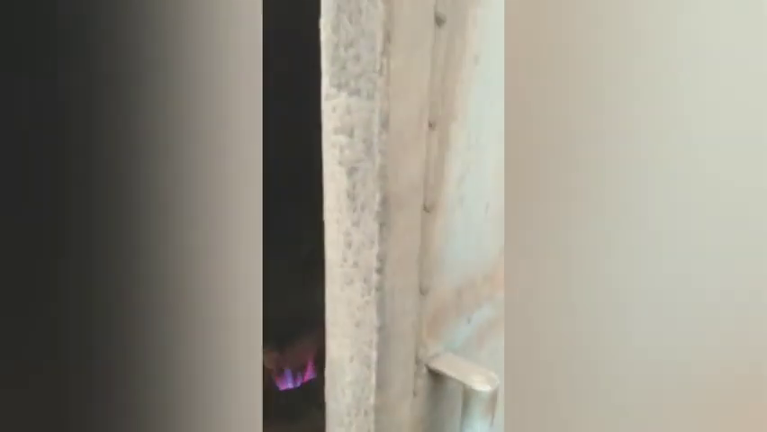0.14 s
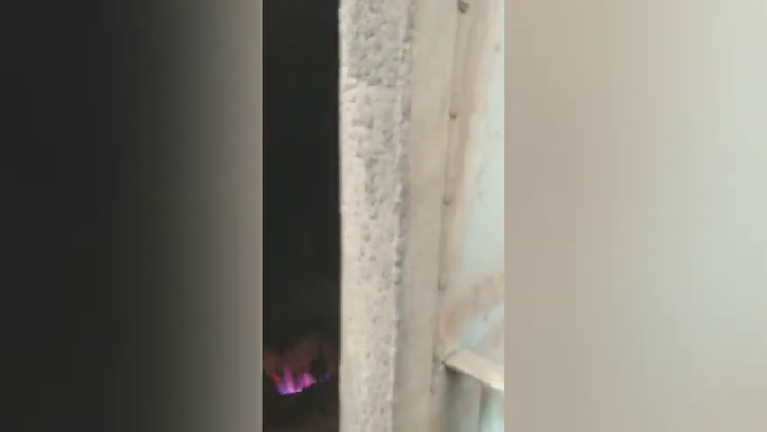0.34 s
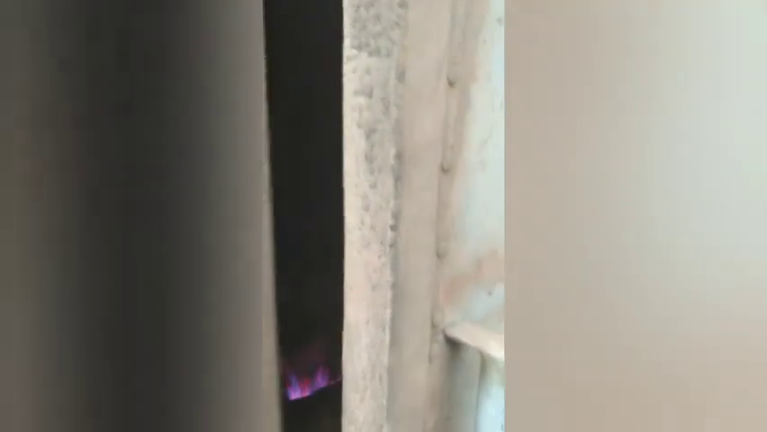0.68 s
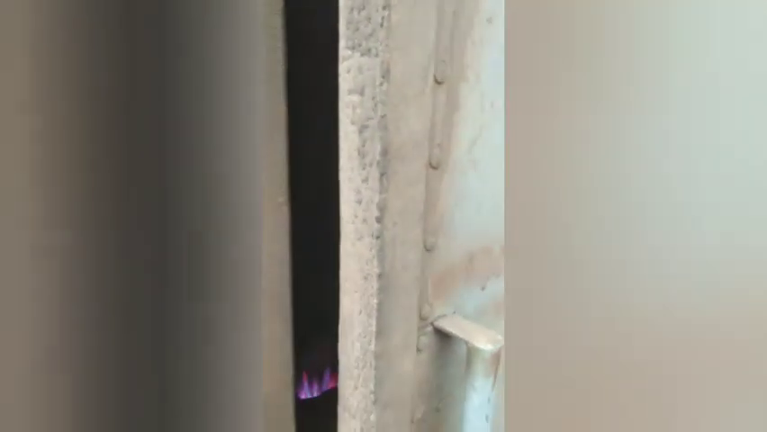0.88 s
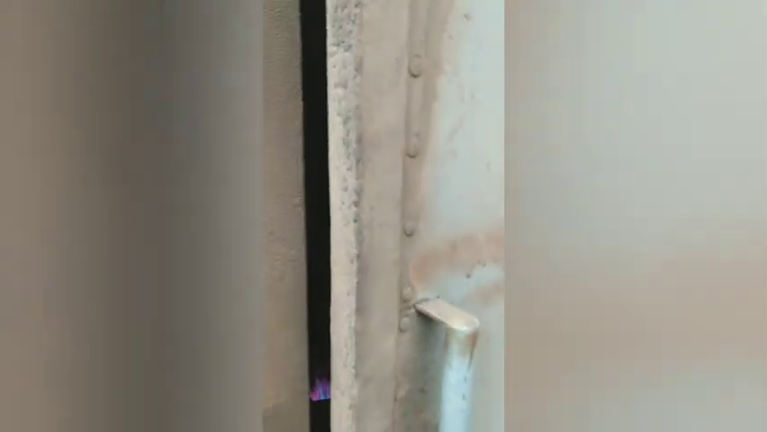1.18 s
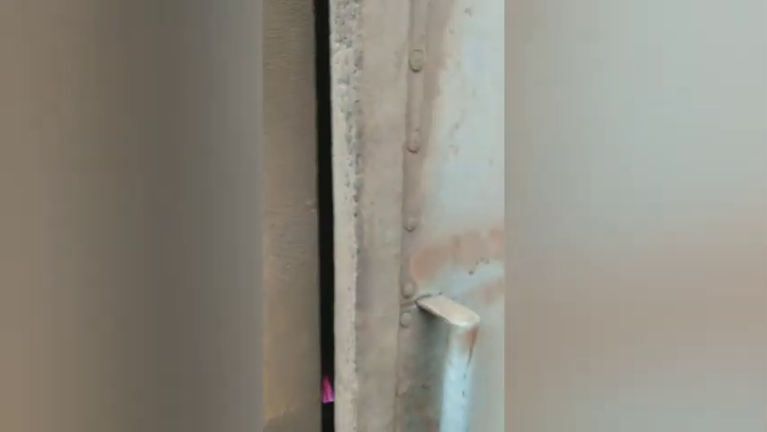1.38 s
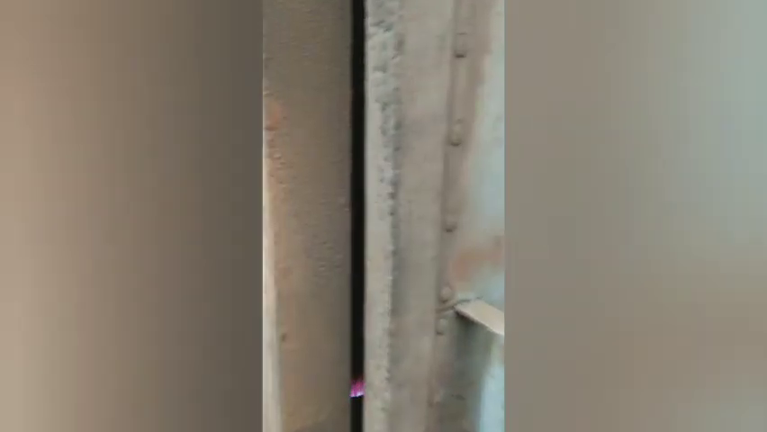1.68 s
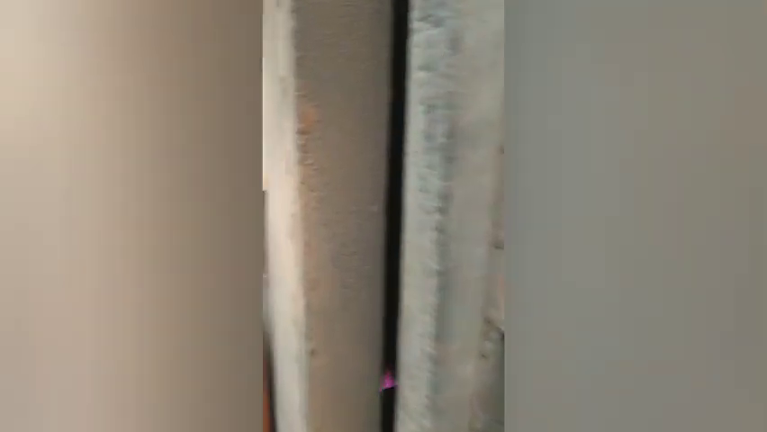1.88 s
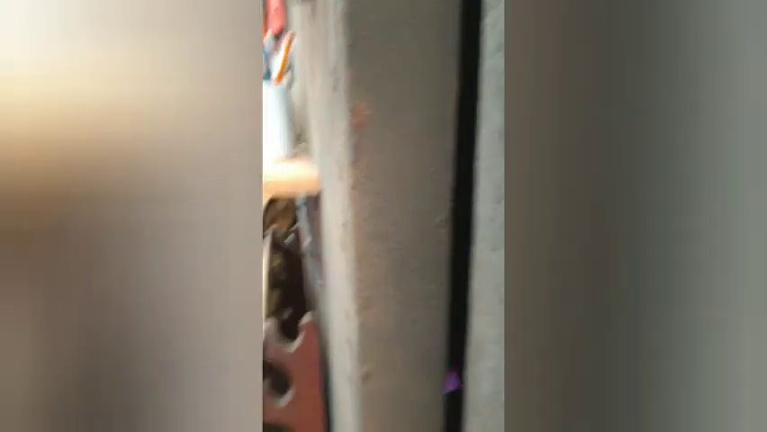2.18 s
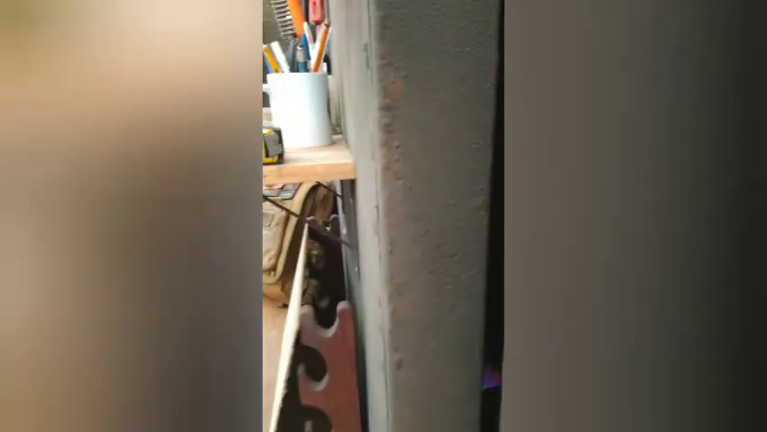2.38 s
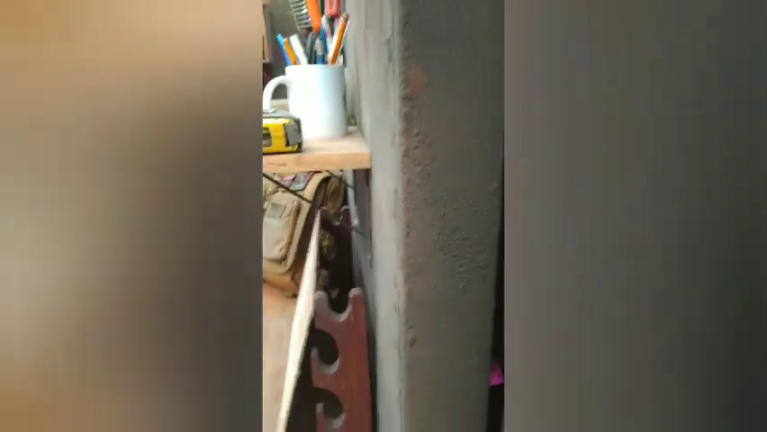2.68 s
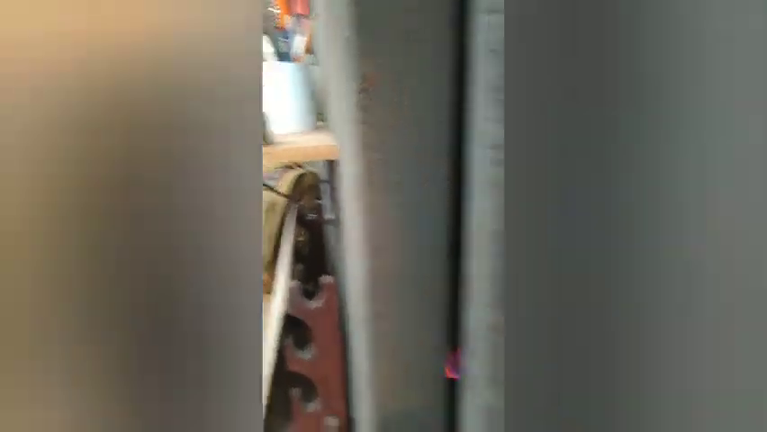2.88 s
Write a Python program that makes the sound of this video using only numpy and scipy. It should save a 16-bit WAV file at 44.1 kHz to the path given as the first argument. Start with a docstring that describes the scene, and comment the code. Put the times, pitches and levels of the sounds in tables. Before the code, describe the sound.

Hollow, low roar of a gas flame in a sheet-metal oven, wavering slightly without pause.

```python
"""A hollow roar sounds at once: a gas burner in a sheet-metal oven, heard through its door gap in a workshop.
Turbulent flame noise drives the air modes of the oven box, each a narrow resonance ringing on noise.
Broad flame noise and the hiss of the jets spread above them; draughts add brief rumbles at the ports.
A phone with two microphone ports far apart turns slowly past the gap.
It makes stereo by subtracting each port, delayed, from the other."""
import sys
import numpy as np
from scipy import signal
from scipy.fft import rfft, irfft
from scipy.io import wavfile
from scipy.ndimage import uniform_filter1d

SR = 44100
rng = np.random.default_rng(int(sys.argv[2]) if len(sys.argv) > 2 else 0)


def boost(x):
    """Linear amplitude factor 10**(x/20) for a level x in decibels (scalar or array-like)."""
    u = np.asarray(x, float) / 20
    return 10 ** u


def store_pcm(level_fs):
    """Save levels as 16-bit WAV."""
    pcm = np.round(np.clip(level_fs, -1, 1) * 32767).astype(np.int16)
    wavfile.write(sys.argv[1], SR, np.atleast_2d(pcm).T)


N = 134505


def at_hz(points, hz, col=1):
    """Interpolation on a logarithmic frequency axis, on which equal ratios are equal steps."""
    points = np.array(points)
    return np.interp(np.log(hz + 1e-9), np.log(points[:, 0]), points[:, col])


def drift(rate_hz):
    """Random modulation of unit spread: white noise through a double low-pass pole."""
    step = 40   # samples between computed points
    pole = np.exp(-2 * np.pi * rate_hz * step / SR)
    noise = rng.standard_normal(N // step + 2002)
    slow = signal.lfilter([1], [1, -2 * pole, pole * pole], noise)[2000:]   # settled part
    return np.interp(np.arange(N) / step, np.arange(len(slow)), slow / slow.std())


def level_db(hz):
    """Amplitude modulation by frequency region: neighbouring level curves blend on a log axis."""
    # centre of each level curve: f/Hz
    centres = [155, 208, 310, 660, 1100, 2900, 6500, 12000]
    # uneven level of the low boom, of which only the swing about the mean counts:
    # t/s, lowest modes level/dB, second mode level/dB, next modes level/dB
    boom = [(0.0, -25, -44, -40), (0.06, -29.5, -39.5, -31.5), (0.12, -29, -30.5, -32.5),
            (0.21, -30, -28, -27.5), (0.33, -32.5, -39.5, -28.5), (0.52, -27.5, -27.5, -28.5),
            (0.6, -30, -34, -29), (0.67, -32, -32.5, -32), (1.09, -27, -40.5, -26), (1.16, -28, -28, -35),
            (1.22, -37, -39, -29.5), (1.47, -31, -28.5, -27), (1.51, -32.5, -38, -29.5),
            (1.57, -39, -32, -29.5), (1.6, -28.5, -43, -24.5), (1.72, -28, -30, -37.5),
            (1.76, -42.5, -42, -29.5), (1.83, -31.5, -19, -28.5), (1.95, -26.5, -34, -26.5),
            (2.08, -47, -27, -31), (2.14, -17, -30, -23.5), (2.18, -29, -28, -32.5),
            (2.31, -25, -40, -29.5), (2.71, -33.5, -28.5, -29.5), (2.9, -24, -39.5, -33.5),
            (3.05, -41, -37.5, -24.5)]
    # uneven level of the roar and hiss, again only the swing about the mean: t/s, lower roar level/dB,
    # roar level/dB, upper roar level/dB, jet hiss level/dB, top of the hiss level/dB
    roar = [(0.03, -44.5, -43.5, -53, -64, -71), (0.37, -45.5, -38, -50, -59, -66),
            (0.47, -41.5, -35.5, -48, -57.5, -68), (0.6, -47, -42, -53, -62, -69.5),
            (0.99, -40.5, -38.5, -47.5, -54, -61.5), (1.02, -36, -38, -45.5, -58, -65),
            (1.22, -41, -37.5, -50, -58, -65.5), (1.59, -42, -37, -53, -60.5, -69.5),
            (1.69, -40.5, -43, -49, -66, -68), (1.75, -47, -35, -57.5, -62, -69),
            (1.79, -34.5, -40.5, -48, -61, -67), (1.83, -46, -36.5, -48.5, -61.5, -69),
            (1.96, -48, -40.5, -53.5, -64.5, -72), (2.09, -40, -37, -49.5, -62, -68),
            (2.3, -45.5, -40, -49.5, -65, -71.5), (2.49, -40.5, -38, -48.5, -60.5, -67),
            (2.6, -40, -37.5, -49, -58.5, -66.5), (2.96, -44, -41, -51.5, -61, -70.5),
            (3.05, -45, -37.5, -50.5, -60, -70)]
    inertia_s = 0.05   # moving average that smooths the levels
    curves = []
    for times, *columns in (np.transpose(boom), np.transpose(roar)):
        curves += [(times, column) for column in columns]
    # an octave below the first centre the swing has faded out: the deepest rumble stays even
    place = np.interp(np.log(hz), np.log([centres[0] / 2, *centres]), np.arange(-1, len(curves)))
    t = np.arange(N) / SR
    swing = np.zeros(N)
    for k, (times, column) in enumerate(curves):
        share = max(0, 1 - abs(place - k))
        swing += share * np.interp(t, times, column - np.mean(column))
    return uniform_filter1d(swing, size=int(inertia_s * SR))


def oven_boom(hz):
    """Cavity resonance: each air mode rings on its own noise, and its strength and balance shift."""
    # air modes of the oven: f/Hz, width/Hz of the resonance factor, level/dB re burner,
    # swell/dB from start to end, left minus right port level/dB at start, the same at end
    modes = [(96.2, 6.8, -34.5, 10, -1, 0.5), (126.1, 5.8, -25.5, -7, 2.2, -3),
             (156.43, 10.2, -18, -1.5, 0.5, -1.3), (179.5, 11.2, -26, -13.5, 4, -1.5),
             (209.6, 7.65, -21.5, 0, -3, -6.5), (246.3, 14, -29, 9, 1.5, -1),
             (298, 12.8, -30.5, 4.5, 6.5, -6), (324.9, 5.8, -29, 0.5, 7, 2.5),
             (348.7, 13.6, -39, 15.5, 4, -4), (377.8, 43, -44, 14, 11, 6), (439, 21.7, -38.5, -4, 9, -1.5),
             (509.6, 38, -42, 3, 10.5, -11), (569.3, 19, -49, 4.5, 5, 3), (934, 49, -56.5, -1, 23.5, -25),
             (1038, 33, -53.5, -3, 4, 6), (1266.5, 36, -57, -7.5, 23, -34)]
    # phase by which the modes reach the left port first: f/Hz, phase/rad
    mode_lead = [(100, .03), (126, .12), (156, .02), (208, .2), (254, .15), (326, -.2), (384, .8),
                 (440, .25), (512, .9), (940, .1)]
    steadiness = 0.62   # 0 free noise, 1 even hum: the flame feeds on the modes and evens their swing
    flicker_db, flicker_hz = 1.42, 5.9
    boom = 0
    for mode_hz, width_hz, db, swell_db, start_db, end_db in modes:
        offset = hz - mode_hz
        resonance = 1 / (1 + 2j * offset / width_hz)
        skirt = 1 / (1 + (offset / (2 * width_hz)) ** 2)   # steepens the flanks
        # positive frequencies alone give a complex signal whose modulus is the envelope
        ringing = np.fft.ifft(2 * rfft(rng.standard_normal(N)) * resonance * skirt, N)
        envelope = abs(ringing)
        rms = np.sqrt(np.mean(envelope ** 2))
        ringing = ringing * (rms / (envelope + 0.29 * envelope.mean())) ** steadiness
        lead = at_hz(mode_lead, mode_hz)
        tone = (ringing * np.exp([[.5j * lead], [-.5j * lead]])).real
        lean = np.linspace(start_db, end_db, N) / 2
        swell = np.linspace(-swell_db, swell_db, N) / 2
        level = db + swell + level_db(mode_hz) + flicker_db * drift(flicker_hz)
        boom = boom + tone * boost(level + np.array([lean, -lean]))
    return boom


def flame(hz):
    """Turbulent combustion noise: broadband, partly coherent between ports, flickering band by band."""
    # broad flame noise: f/Hz, level/dB re burner alike at both ports,
    # level/dB re burner opposite at the ports, left minus right level/dB
    spectrum = [(19.9, -60, -81, 20), (45, -50, -51, 4), (85, -42.5, -69, -3), (153, -39, -59.5, 1.5),
                (235, -44.5, -46.5, -12), (327, -39.5, -51.5, 7), (428, -52, -51.5, -4),
                (520, -58.5, -48.5, 6.5), (616, -60, -62, -7), (820, -59.5, -68.5, -8.5),
                (1084, -56, -55.5, 4.5), (1190, -57, -63, -7.5), (1370, -59, -56, -1.5),
                (1790, -62, -61, -1), (2230, -65.5, -64, -1), (2640, -68.5, -72, 6.5),
                (3370, -74, -73.5, -1), (4350, -78.5, -80.5, 2), (5420, -85.5, -83, 1),
                (6970, -86, -87.5, 4.5), (9100, -88, -87, 0.5), (12100, -90.5, -93.5, 2.5),
                (15500, -96, -93, 2)]
    flicker_db, shared_flicker_db = 1.08, 0.39
    flutter_db, flutter_hz, flutter_from_hz = 0.87, 25, 9800   # the jets flutter together
    levels = np.array([at_hz(spectrum, hz, col=1), at_hz(spectrum, hz, col=2)])
    alike, opposite = rfft(rng.standard_normal((2, N))) * boost(levels)
    lean = at_hz(spectrum, hz, col=3) / 2
    ports = np.array([(alike + opposite) * boost(lean), (alike - opposite) * boost(-lean)])
    together = shared_flicker_db * drift(6)
    flutter = flutter_db * drift(flutter_hz)
    place = 2 * np.log2(np.clip(hz, 40, 14000) / 40)   # half octaves above 40 Hz
    roar = 0
    for k in range(18):
        centre_hz = 40 * 2 ** (k / 2)
        band = irfft(ports * np.clip(1 - abs(place - k), 0, 1), N)   # overlapping triangles
        jets = 1 / (1 + (flutter_from_hz / centre_hz) ** 2)
        flicker = flicker_db * drift(9) + together + jets * flutter
        roar = roar + band * boost(level_db(centre_hz) + flicker)
    return roar


def rippled(noise):
    """Modal interference: dense upper modes lift and dip narrow strips as the phone moves; one strip glides."""
    ripple_db, width_hz, hold_s = 2, 19.4, 0.35   # low-frequency spread, strip width, persistence
    fades_hz = 11000   # the ripple weakens towards and above this
    glide_s, glide_length_s, glide_width_hz, glide_db = 2.154, 0.16, 85, 7
    glide_hz, glide_hz_per_s = 1203, 2150   # centre at glide_s, upward speed
    hz, t, cells = signal.stft(noise, SR, nperseg=4096, noverlap=3072)
    field = rng.standard_normal(cells.shape[1:])
    for axis, span in enumerate([width_hz / hz[1], hold_s / t[1]]):
        bell = np.exp(-2 * (np.arange(-20, 21) / span) ** 2)
        field = signal.fftconvolve(field, np.expand_dims(bell, 1 - axis), "same")
    hz = hz[:, None]
    ripple = ripple_db / np.sqrt(1 + (hz / fades_hz) ** 2) * field / field.std()
    centre = glide_hz + glide_hz_per_s * (t - glide_s)
    near_centre = ((hz - centre) / glide_width_hz) ** 2
    near_moment = ((t - glide_s) / glide_length_s) ** 2
    glide = glide_db * np.exp(-.5 * near_centre - .5 * near_moment)
    return signal.istft(cells * boost(ripple + glide), SR, nperseg=4096, noverlap=3072)[1][:, :N]


def draughts():
    """Pressure gradient of moving air: short lumps of low rumble push on one port and pull on the other."""
    # draughts on the ports: t/s of the peak, Gaussian spread t/s, level/dB at the ports
    gusts = [(0.036, 0.13, -36), (0.163, 0.053, -38), (0.288, 0.026, -34), (1.502, 0.017, -36)]
    t = np.arange(N) / SR
    envelope = sum(boost(db) * np.exp(-.5 * ((t - peak) / spread) ** 2) for peak, spread, db in gusts)
    rumble_band = signal.butter(3, [40, 87], "band", fs=SR, output="sos")   # Hz
    rumble = signal.sosfilt(rumble_band, rng.standard_normal(N))
    return envelope * rumble / rumble.std() * [[1], [-1]]


def scene():
    """Superposition: the pressures of burner and draughts add at the two ports."""
    burner_db = 29.5
    hz = np.fft.rfftfreq(N, 1 / SR)
    burner = oven_boom(hz) + rippled(flame(hz))
    return boost(burner_db) * burner + draughts()


def top_cut(x):
    """Nothing passes above the cut-off."""
    return signal.sosfilt(signal.butter(12, 15490, fs=SR, output="sos"), x)


def record(dry):
    """Delay-and-subtract directivity: each channel is its port minus the other delayed, then band-limited."""
    # share of the other port that is subtracted: f/Hz, share/1
    crossfeed = [(100, 0.65), (2000, 0.65), (3200, 0.74), (4250, 0.67), (6400, 0.58), (9000, 0.24),
                 (14000, .08)]
    port_delay_s, right_lead_s = 0.0004758, 0.000014
    mic_low_hz, top_hz, fade_in_s = 45, 15520, 0.004
    margin = 256   # samples of mirrored sound that keep the ends from wrapping round
    size = N + 2 * margin
    padded = np.pad(dry, [(0, 0), (margin, margin)], "reflect", reflect_type="odd")
    left, right = rfft(padded * signal.windows.tukey(size, 384 / N))
    hz = np.fft.rfftfreq(size, 1 / SR)
    cross = at_hz(crossfeed, hz) * np.exp(-2j * np.pi * hz * port_delay_s)
    right_lead = np.exp(2j * np.pi * hz * right_lead_s)
    pair = np.array([left - cross * right, (right - cross * left) * right_lead])
    pair = pair / (1 + (mic_low_hz / (hz + 1e-9)) ** 2)
    stereo = irfft(pair * (hz < top_hz), size)[:, margin:-margin]
    fade_in = np.minimum(np.arange(N) / (fade_in_s * SR), 1)
    return top_cut(stereo * fade_in)


dry = scene()
out = record(dry)
store_pcm(out)
```